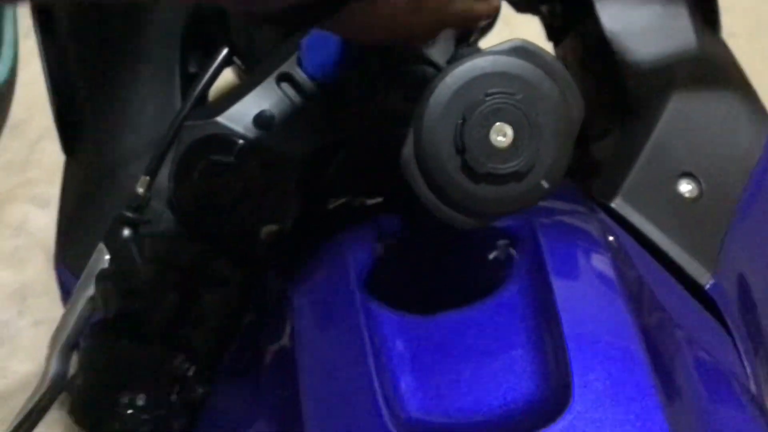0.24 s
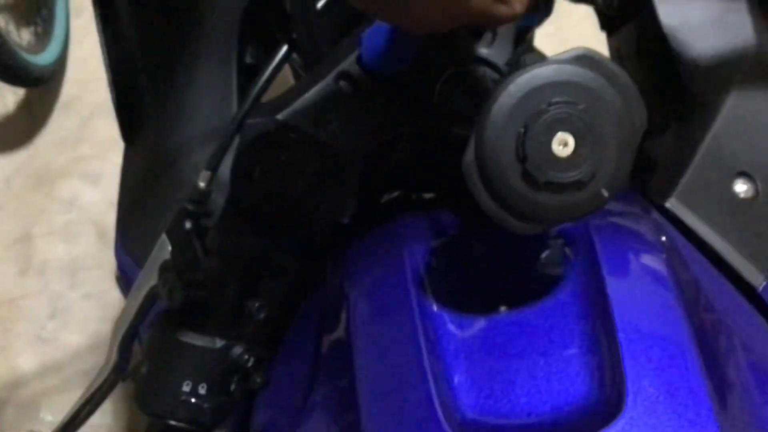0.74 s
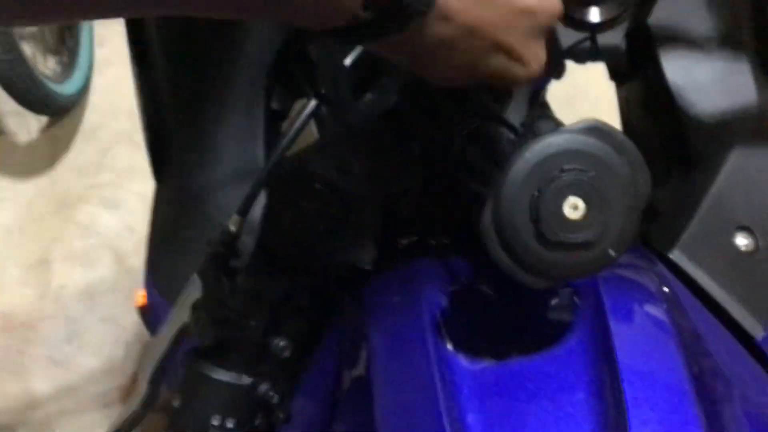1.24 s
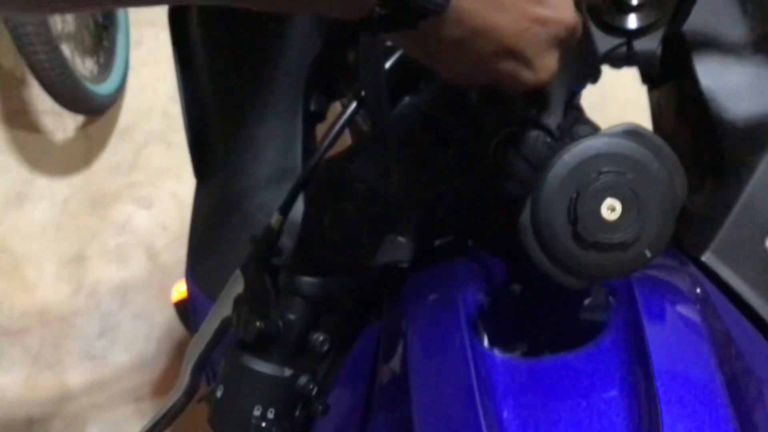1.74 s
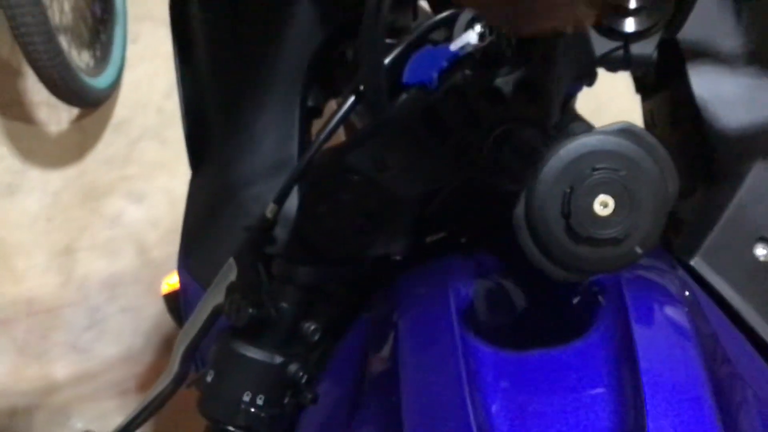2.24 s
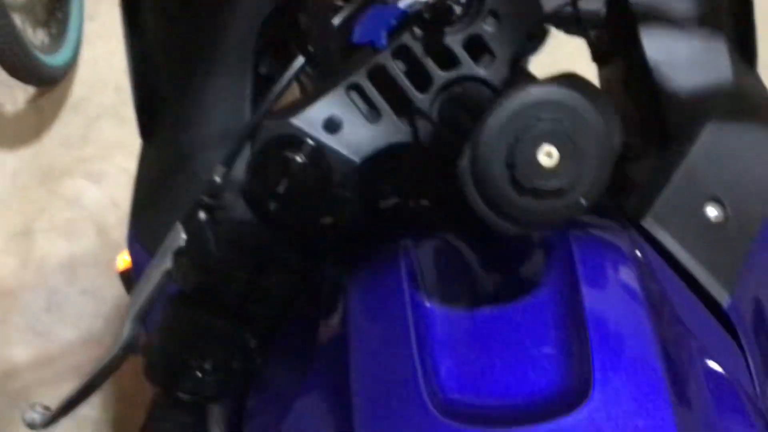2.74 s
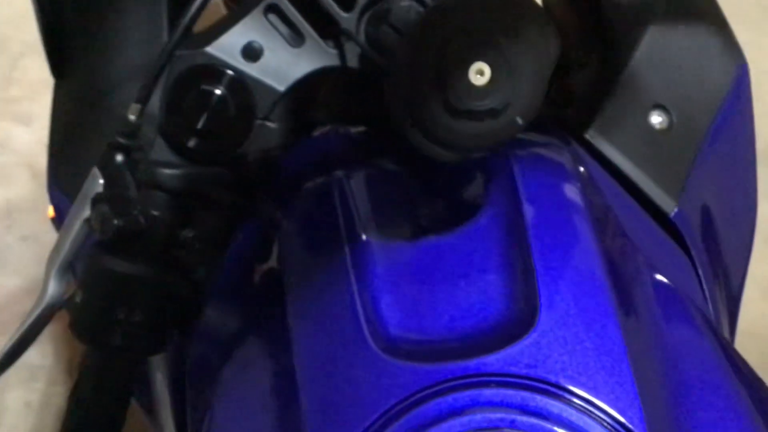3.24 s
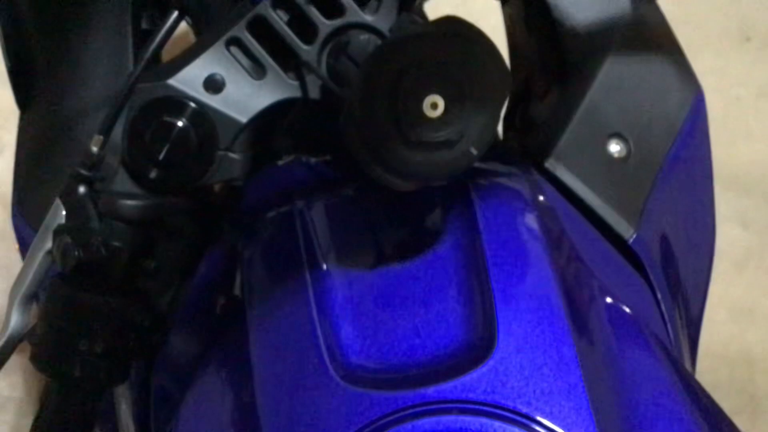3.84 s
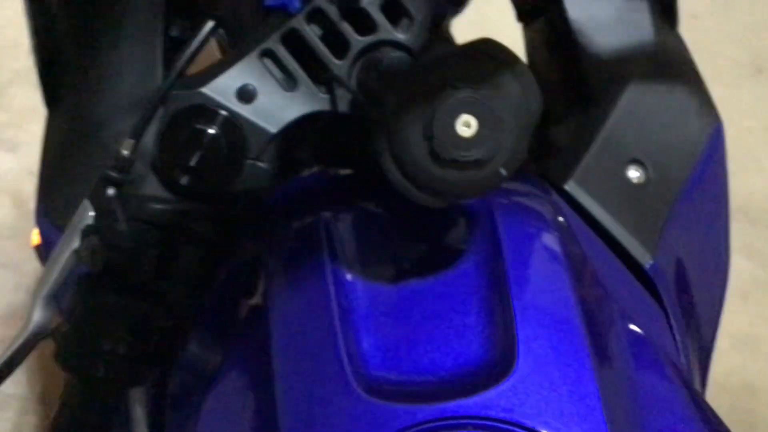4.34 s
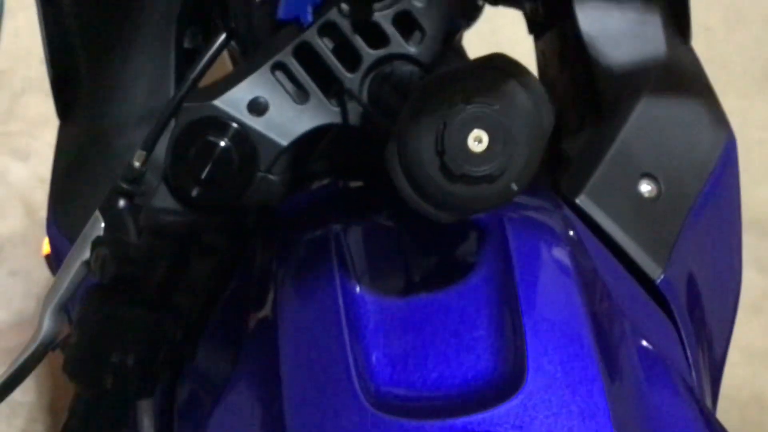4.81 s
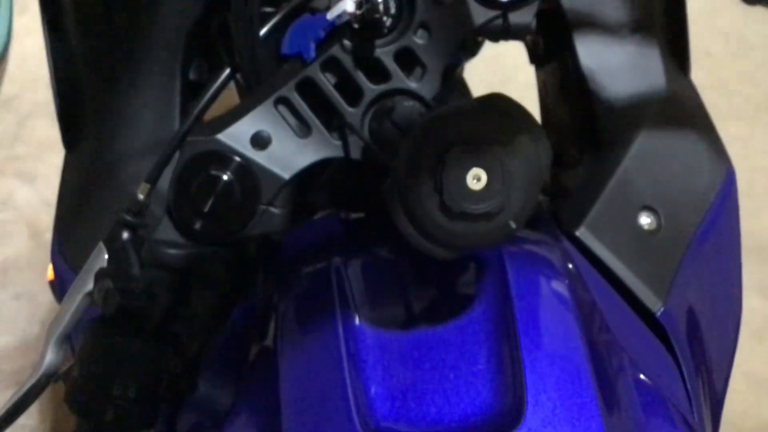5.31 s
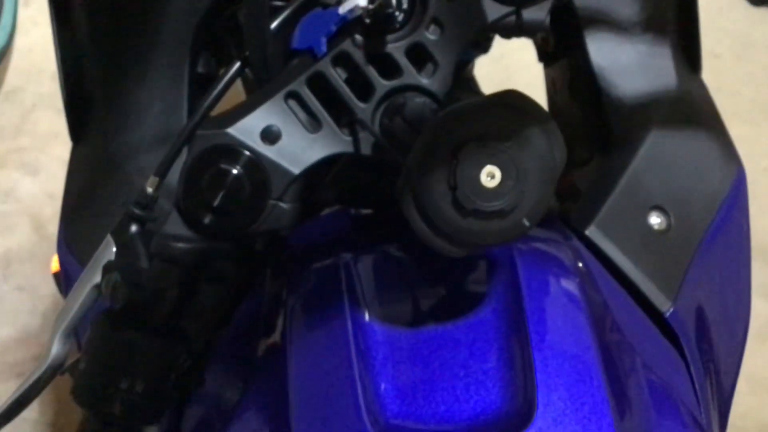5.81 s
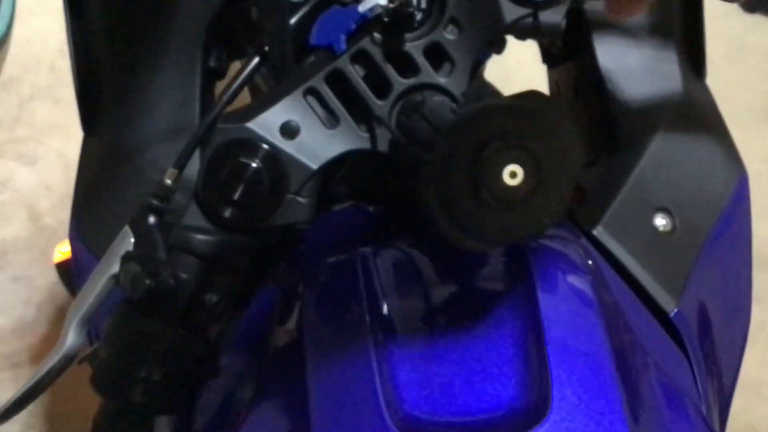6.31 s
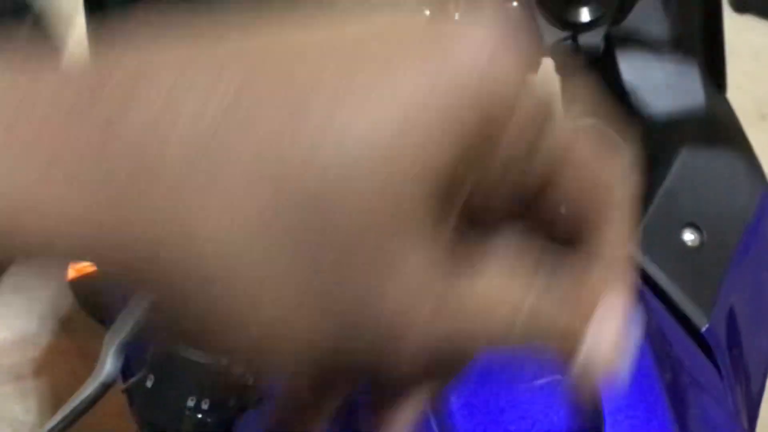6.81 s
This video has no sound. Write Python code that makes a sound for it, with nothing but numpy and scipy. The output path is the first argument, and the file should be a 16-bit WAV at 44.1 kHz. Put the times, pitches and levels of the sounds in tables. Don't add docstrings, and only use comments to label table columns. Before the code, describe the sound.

A close microphone hears a quiet, hard-walled garage with faint low mains hum. From 0.2 to 2.0 seconds, a key makes sparse light metallic clicks, brightest near 1.25, with a slight barrel ring and a barely audible squeak around 2.3. At 2.5 the steering lock releases with hollow knocks and clicks; the bars rub softly from 3.0 and reach straight with a duller knock at 3.5. Tiny clicks follow around 3.8 and 4.6. A crisp switch snap at 4.73 brings a faint hiss, then a loud relay snap at 4.94. The geared starter whines and grinds, rising then sagging until about 5.2, with a thin high clutch tone. The two-cylinder engine catches unevenly at 5.23 and idles from 5.6, about twelve paired low thumps per second, with muffler boom, gas rush and rattling clatter. Another click lands near 5.96; the idle continues to the end, around 7.1.

```python
import sys
import numpy as np
from scipy import signal
from scipy.fft import rfft, irfft, next_fast_len
from scipy.io import wavfile
from scipy.ndimage import uniform_filter1d

SR = 44100
rng = np.random.default_rng(int(sys.argv[2]) if len(sys.argv) > 2 else 0)


def transcribe(u):
    v = np.clip(np.atleast_2d(u).T, -1, 1)
    q = np.round(v * 32767).astype(np.int16)
    wavfile.write(sys.argv[1], SR, q)


def elevation(decibels):
    levels = np.asarray(decibels, float)
    return 10 ** (levels / 20)


N = 311624

# (frequency [Hz], density [dB per Hz])
AIR_SPECTRUM = [(15, -50), (25, -25), (43, -6), (66, -2.5), (102, -9.5), (141, -3.5), (249, -11.5),
                (363, -13), (503, -26), (677, -24), (863, -30.5), (8830, -41.5), (16000, -51)]
AIR_DB = -67
# (frequency [Hz], width [Hz], level [dB])
MAINS_HUM = (58, 1.3, -76.5)
# (frequency [Hz], t60 [s])
GARAGE_DECAY = [(250, 0.53), (660, 0.56), (1740, 0.76), (4590, 0.49), (12000, 0.23)]

# (time [s], level [dB], fall [dB per s], low band [Hz], high band
# [dB])
RUBS = [
    (3.01, -67, 125, 508, -24),
    (3.49, -57, 255, 780, -18),
    (4.734, -57, 229, 1850, 0),
]
RUB_RISE_S, RUB_HIGH_RATIO = 0.027, 2.74
# (start [s], hold [s], level [dB], low band [Hz], high band [dB])
FUEL_PUMP = (4.77, .125, -66, 1800, 3)
RISE_DB = 22
# (start [s], hold [s], pitch [Hz], level [dB])
SQUEAKS = [
    (2.29, .11, 3240, -86),
    (4.905, .012, 8000, -68),
    (6.21, .008, 4100, -50),
]
# (time [s], peak [dB], pitch [Hz], t60 [s])
KNOCKS = [(2.5, -31, 373, 0.22), (2.505, -50, 90, 0.48), (2.513, -29, 240, 0.13),
          (2.573, -35.5, 330.5, 0.19), (3.055, -57.5, 526, 0.5), (3.505, -50, 494, 0.85),
          (3.577, -46.5, 211.6, 0.56), (3.581, -38, 371, 0.17), (3.586, -41.5, 94, 0.29)]

# (time [s], peak [dB], ring [Hz], low knock [dB], bright tick [dB])
KEY_CLICKS = [(0.1625, -62, 1440, 4, -14), (0.2238, -37.5, 1356, -5, -14), (0.648, -65, 2120, -12, -20),
              (0.744, -70, 2580, -6, -22), (1.001, -55.5, 2320, 3.5, -29), (1.1104, -67, 930, 5, -27),
              (1.1996, -49, 2450, 2, -29), (1.2311, -40, 3520, -9.5, -12), (1.265, -29, 3280, -4.5, -16),
              (1.7719, -65, 1540, -5, -27), (1.9085, -56, 2730, 4.5, -6), (1.939, -47, 2110, -2, -0.5),
              (1.9506, -49, 1020, 0, -33.5), (2.0024, -58.5, 900, -3, -5)]
# (time [s], peak [dB], ring [Hz], low knock [dB], bright tick [dB])
LOCK_CLICKS = [(2.5167, -37.5, 1540, 12.5, -10), (2.5753, -39, 955, 1.5, -30), (2.598, -65, 1580, -4, -24),
               (2.622, -44, 1670, -22, -26), (3.0669, -60, 2030, 4, -34), (3.379, -67, 1770, -13, -25.5),
               (3.5187, -38.5, 990, 6, -5.5), (3.5547, -58, 1110, 17, -28.5)]
# (time [s], peak [dB], ring [Hz], low knock [dB], bright tick [dB])
SWITCH_CLICKS = [(3.7956, -58.5, 1460, 3, -12), (3.9065, -57, 1470, 0.5, -18),
                 (4.6327, -45.5, 3980, -15, -18), (4.7348, -23, 2530, -14, -8),
                 (4.9356, -14, 3230, -5, -2.5), (5.9635, -24.5, 2870, 8.5, -4),
                 (7.0624, -31.5, 855, -8, -15)]
KEY_ECHO_DB, LOCK_ECHO_DB, SWITCH_ECHO_DB = -2, -4, -6
RING_SHARE = 0.42
# (frequency [Hz], width [Hz], level [dB])
BARREL_MODES = [(660, 9, -41), (705, 8, -41), (1190, 11, -50), (1300, 11, -51)]
KEY_SEATED_S = 1.15
# (frequency [Hz], width [Hz], level [dB], spacing [Hz])
LOCK_PLATE = (1575, 4.5, -53.5, 44)

SPIN_S, SPIN_STOP_S, SPIN_SETTLE_S = 5.3, 5.965, 0.17
SPIN_FROM_HZ, SPIN_TO_HZ, SPIN_DB, SPIN_SWELL_DB = 10850, 11800, -71, 8
# (start [s], hold [s], level [dB], fall [dB per s])
CLUTCH_SONGS = [
    (5.12, .075, -55.5, 400),
    (5.24, .03, -57.5, 125),
]
CLUTCH_HZ, CLUTCH_RISE_S = 5960, 0.02

# (time [s], mesh frequency [Hz])
STARTER_SPEED = [(4.95, 720), (4.99, 930), (5.015, 1150), (5.04, 1265), (5.068, 1440), (5.11, 1545),
                 (5.15, 1475), (5.192, 1180), (5.3, 1480)]
# (multiple of the mesh [1], level [dB])
MESH_HARMONICS = [(1, -3), (2, -2), (3, -4), (4, -17)]
# (frequency [Hz], width [Hz], level [dB])
CASING_MODES = [(502, 43, -3), (1136, 36, -18), (1297, 24, -9.5), (1505, 27, -11), (1886, 85, -3.5),
                (2505, 100, -11.5), (2965, 34, -15), (3455, 25, 2.5), (4090, 48, -16), (4655, 46, -12),
                (5700, 30, -7), (6800, 33, -1)]
# (frequency [Hz], density [dB per Hz])
GRIND_SPECTRUM = [(60, -24), (150, -3), (373, 5.5), (800, -5), (1520, -4), (3200, -6.5), (5300, -18),
                  (8000, -19.5), (11000, -30), (14500, -27), (16000, -21)]
CRANK_S, CRANK_RISE_S, CRANK_HOLD_S, CRANK_DB = 4.945, 0.02, 0.256, -37
STRAIN_DB_PER_KHZ_S = 0.5956
BITE_DB_PER_KHZ_S = 0.7
LET_GO_DB_PER_S, COAST_DB, COAST_DB_PER_S = 422, -20, 110

# (time [s], first cylinder [dB], second cylinder [dB])
CATCH_CYCLES = [(5.2281, 1.4, 2.5), (5.3559, -1.1, -.6), (5.4608, 1.6, .2), (5.55, -.7, -2.3)]
CATCH_GAP_S = 0.0234
# (time [s], speed [cycles per s])
IDLE_SPEED = [(5.6, 10.978), (5.75, 12.209), (5.9, 11.757), (6.1, 11.847), (6.3, 11.903), (6.45, 11.502),
              (6.6, 11.565), (6.8, 11.71), (7.07, 11.225)]
STEADY_S, SECOND_LAG_CYCLES, SECOND_DB = 5.6408, 0.25, -5.2
FULL_LOAD_SPEED, LOAD_DB_PER_SPEED = 11.2, -2.2
# (frequency [Hz], width [Hz], signed strength [1])
BOOM_MODES = [(59.7, 3, -.02), (80.6, 4.64, .064), (97.04, 4.52, -.162), (105.12, 5.64, .117)]
# (frequency [Hz], width [Hz], level [dB])
PIPE_MODES = [(139, 25, -24.5), (201.2, 10.4, -30), (240, 26, -36), (286.5, 12.3, -32.5),
              (377.3, 15.6, -32), (496.6, 52, -27), (516, 17, -31.5), (629, 30, -33.5)]
PIPE_RISE_S = 0.0069
# (frequency [Hz], width [Hz], level [dB])
BLOCK_MODES = [(523, 32, -17.5), (1110, 32, -14), (1329, 17, -20.5), (1460, 26, -26), (1940, 100, -21),
               (2580, 71, -51), (3454, 54, -24), (4170, 120, -41)]
CLATTER_DB, TAPS_PER_S = 2.5, 160
# (frequency [Hz], density [dB per Hz])
ROAR_SPECTRUM = [(60, -37), (125, -16.5), (300, -16), (430, -22.5), (560, -15.5), (870, -30.5), (1600, -29),
                 (2400, -34.5), (3450, -37), (5000, -46.5), (7300, -62), (9000, -56), (14500, -57),
                 (16000, -47.5)]
ROAR_DB = -34
STEADY_RUSH = 0.5
# (time [s], opening [dB])
THROTTLE = [(5.2, 6.5), (5.35, -2.5), (5.55, -2), (5.8, 1.5), (7.07, -1.5)]


def evened(x):
    return x / np.sqrt(np.mean(x ** 2) + 1e-20)


def read(points, hz):
    f, value = np.transpose(points)
    return np.interp(np.log(hz + 1), np.log(f + 1), value)


def add(mix, s, sound):
    part = mix[round(s * SR):][:len(sound)]
    part += sound[:len(part)]


def curve(rows):
    s, value = np.transpose(rows)
    return np.interp(np.arange(N) / SR, s, value)


def envelope_db(start, rise, hold, fall):
    t = np.arange(N) / SR - start
    attack = np.minimum(RISE_DB * (t / rise - 1), 0)
    return attack - fall * np.maximum(t - rise - hold, 0) - 200 * (t < 0)


def noise(points):
    size = next_fast_len(N)
    gain = elevation(read(points, np.fft.rfftfreq(size, 1 / SR)))
    return evened(irfft(rfft(rng.standard_normal(size)) * gain, size)[:N])


def resonate(x, hz, width):
    turn = np.exp(2j * np.pi * np.cumsum(hz * np.ones(len(x))) / SR)
    r = np.exp(-np.pi * width / SR)
    return 2 * (turn * signal.lfilter([1 - r], [1, -r], x / turn)).real


def ring(hz, width, seconds):
    t = np.arange(round(seconds * SR)) / SR
    return np.exp(-np.pi * width * t) * np.sin(2 * np.pi * hz * t)


def garage(x):
    taps = np.zeros(SR)
    at = np.arange(250, SR - 20, 20)
    taps[at + rng.integers(0, 20, len(at))] = rng.choice([-1., 1.], len(at))
    hz, t, z = signal.stft(taps, SR, nperseg=256)
    decay = elevation(-60 * t / read(GARAGE_DECAY, hz)[:, None])
    tail = signal.istft(z * decay, SR, nperseg=256)[1]
    return signal.fftconvolve(x, tail / np.linalg.norm(tail))[:N]


def air():
    hz, width, db = MAINS_HUM
    steady = np.sqrt(2) * np.sin(2 * np.pi * hz * np.arange(N) / SR)
    throb = 0.5 * evened(resonate(rng.standard_normal(N), hz, width))
    return elevation(AIR_DB) * noise(AIR_SPECTRUM) + elevation(db) * (steady + throb)


def rub(level_db, low_hz, high_db):
    on = np.flatnonzero(level_db > -110)
    high_hz = RUB_HIGH_RATIO * low_hz
    grit = signal.lfilter([1], [1, -0.6], rng.standard_normal(len(on)))
    low = evened(resonate(grit, low_hz, 590))
    high = evened(resonate(resonate(grit, high_hz, 1900), high_hz, 1900))
    return on[0] / SR, elevation(level_db[on]) * (low + elevation(high_db) * high)


def rubbing():
    out = np.zeros(N)
    for s, db, fall, low_hz, high_db in RUBS:
        add(out, *rub(db + envelope_db(s, RUB_RISE_S, 0, fall), low_hz, high_db))
    s, hold, db, low_hz, high_db = FUEL_PUMP
    add(out, *rub(db + envelope_db(s, 0.05, hold, 2000), low_hz, high_db))
    return out


def squeak(s, hold, hz, db):
    level_db = db + envelope_db(s, 0.02, hold, 900)[round(s * SR):][:SR // 4]
    return elevation(level_db) * evened(resonate(rng.standard_normal(len(level_db)), hz, 60))


def thuds():
    out = np.zeros(N)
    push = signal.windows.hann(60)
    for s, db, hz, t60 in KNOCKS:
        others = sum(ring(hz * k, 4 / t60, 0.5) for k in rng.uniform(0.524, 1.6, 4))
        body = ring(hz, 3.9 / t60, 0.5) + 0.5 * others
        body *= 1 - np.exp(-np.arange(len(body)) / (0.006 * SR))
        add(out, s, elevation(db) * np.convolve(body, push / push.sum()))
    out = out + elevation(-8) * garage(out)
    for s, hold, hz, db in SQUEAKS:
        add(out, s, squeak(s, hold, hz, db))
    return out


def click(hz, low_db, tick_db):
    t = np.arange(1500) / SR
    a, b, c = rng.standard_normal((3, len(t)))
    burst = (t / 0.0022) ** 2 * np.exp(2 - 2 * t / 0.0028)
    band = signal.butter(6, (900, 5250), "bandpass", fs=SR, output="sos")
    crack = evened(signal.sosfilt(band, a))
    knock = elevation(low_db) * evened(resonate(b, 427, 280)) * t / 0.0078 * np.exp(1 - t / 0.0045)
    bright = resonate(resonate(c, 21500, 3500), 14700, 7600) + 0.37 * resonate(c, 9200, 2100)
    tick = elevation(tick_db) * evened(bright)
    tone = RING_SHARE * np.sin(2 * np.pi * hz * t) * burst ** 2
    direct = tone + (0.45 * crack + 0.98 * tick) * burst + knock
    scatter = (crack + 0.46 * evened(resonate(c, hz, 900)) + 0.44 * tick) * np.exp(-t / 0.0036)
    return direct, scatter + 2.35 * knock


def clicks():
    near, far = np.zeros(N), np.zeros(N)
    groups = ((KEY_CLICKS, KEY_ECHO_DB), (LOCK_CLICKS, LOCK_ECHO_DB), (SWITCH_CLICKS, SWITCH_ECHO_DB))
    for table, echo_db in groups:
        for s, db, hz, low_db, tick_db in table:
            direct, scattered = click(hz, low_db, tick_db)
            add(near, s, elevation(db - 9) * direct)
            add(far, s, elevation(db + echo_db - 17.5) * scattered)
    key = near * (np.arange(N) < KEY_SEATED_S * SR)
    modes = sum(elevation(db) * ring(hz, width, 0.5) for hz, width, db in BARREL_MODES)
    barrel = signal.oaconvolve(key, modes)[:N]
    lock = near * curve([(2.4, 0), (2.45, 1), (3.6, 1), (3.7, 0)])
    hz, width, db, spacing = LOCK_PLATE
    pair = ring(hz, width, 0.5) + ring(hz + spacing, width, 0.5)
    plate = elevation(db) * signal.oaconvolve(lock, pair)[:N]
    return near + garage(far) + barrel + plate


def freewheel():
    t = np.arange(N) / SR
    since = np.clip(t - SPIN_S, 0, None)
    settling = np.exp(-since / SPIN_SETTLE_S)
    hz = SPIN_TO_HZ - (SPIN_TO_HZ - SPIN_FROM_HZ) * settling
    spin = sum(gain * evened(resonate(rng.standard_normal(N), hz * k, 25)) for k, gain in ((1, 1), (1.25, 0.6)))
    spinning = (since > 0) * (since < SPIN_STOP_S - SPIN_S)
    spin *= elevation(SPIN_DB - SPIN_SWELL_DB * settling) * spinning
    song = sum(elevation(db + envelope_db(s, CLUTCH_RISE_S, hold, fall)) for s, hold, db, fall in CLUTCH_SONGS)
    fuzz = 0.6 * evened(resonate(rng.standard_normal(N), CLUTCH_HZ, 40))
    return spin + song * (np.sin(2 * np.pi * CLUTCH_HZ * t) + fuzz)


def starter():
    hz = curve(STARTER_SPEED)
    strain = uniform_filter1d(abs(np.gradient(hz)) * SR / 1000, 1300)
    cranking = envelope_db(CRANK_S, CRANK_RISE_S, CRANK_HOLD_S, LET_GO_DB_PER_S) + STRAIN_DB_PER_KHZ_S * strain
    coasting = COAST_DB + envelope_db(CRANK_S, CRANK_RISE_S, CRANK_HOLD_S + 0.16, COAST_DB_PER_S)
    db = CRANK_DB + np.maximum(cranking, coasting)
    jitter = 0.12 * uniform_filter1d(rng.standard_normal(N), 200)
    turns = np.cumsum(hz * (1 + jitter)) / SR
    teeth = np.zeros(N)
    for k, level_db in MESH_HARMONICS:
        wear = evened(uniform_filter1d(uniform_filter1d(rng.standard_normal(N), 330), 330))
        teeth += elevation(level_db + 4.5 * wear) * np.sin(2 * np.pi * k * turns)
    lumps = elevation(1.4 * np.sin(2 * np.pi * turns / 38))
    slowing = uniform_filter1d(1. * (np.gradient(hz) < 0), 600)
    bite = elevation(BITE_DB_PER_KHZ_S * strain * slowing)
    grind = noise(GRIND_SPECTRUM)
    drive = evened(teeth) * lumps * bite + 0.35 * grind
    casing = sum(elevation(peak_db) * resonate(drive, f, width * 1.3) for f, width, peak_db in CASING_MODES)
    on = curve([(4.94, 0), (4.945, 1), (5.4, 1), (5.41, 0)])
    return elevation(db) * on * evened(0.6 * grind + 0.24 * drive + 3 * casing)


def firings():
    speed = curve(IDLE_SPEED)
    load_db = LOAD_DB_PER_SPEED * (speed - FULL_LOAD_SPEED)
    turns = np.cumsum(speed) / SR
    turns -= turns[round(STEADY_S * SR)]
    out = np.zeros(N)
    for lag, db in ((0, 0), (SECOND_LAG_CYCLES, SECOND_DB)):
        at = np.searchsorted(turns, np.arange(lag, turns[-1]))
        out[at] = elevation(load_db[at] + db)
    for s, first_db, second_db in CATCH_CYCLES:
        out[round(s * SR)] = elevation(first_db)
        out[round((s + CATCH_GAP_S) * SR)] = elevation(second_db)
    return out


def exhaust_pipe(fire):
    modes = sum((-1) ** k * elevation(db) * ring(hz, width, 0.3) for k, (hz, width, db) in enumerate(PIPE_MODES))
    swell = 1 - np.exp(-np.arange(len(modes)) / (PIPE_RISE_S * SR))
    return signal.fftconvolve(fire, modes * swell)[:N]


def gas_puffs(fire):
    t = np.arange(9000) / SR
    flow = t / 0.01 * np.exp(1 - t / 0.0077) + 0.5 * (np.exp(-t / 0.19) - np.exp(-t / 0.011))
    return signal.fftconvolve(fire, flow)[:N] * elevation(curve(THROTTLE))


def block_clatter():
    rattle = elevation(4 * np.minimum(rng.exponential(1, N), 2.5)) * rng.standard_normal(N)
    out = np.zeros(N)
    for hz, width, db in BLOCK_MODES:
        taps = rattle * (rng.random(N) < TAPS_PER_S / SR)
        out += elevation(db) * evened(resonate(taps, hz, width))
    return out


def engine():
    fire = firings()
    boom_modes = sum(strength * ring(hz, width, 1) for hz, width, strength in BOOM_MODES)
    boom = elevation(0.5) * signal.fftconvolve(fire, boom_modes)[:N]
    uneven = fire * elevation(0.7 * rng.standard_normal(N))
    puff = gas_puffs(uneven)
    running = np.cumsum(fire) > 0
    gas = noise(ROAR_SPECTRUM) * (puff + STEADY_RUSH * running)
    rush = elevation(ROAR_DB - 5.5) * (gas + elevation(CLATTER_DB) * block_clatter() * puff)
    return boom + exhaust_pipe(uneven) + rush + elevation(-9) * garage(rush)


def scene():
    crank = starter()
    background = air() + rubbing() + thuds() + clicks()
    starting = freewheel() + crank + elevation(-7.5) * garage(crank)
    return (background + starting + engine())[None]


def band_limit(x):
    return signal.sosfilt(signal.butter(12, 15850, fs=SR, output="sos"), x)


def record(dry):
    low_cut = signal.butter(4, 40, "highpass", fs=SR, output="sos")
    treble = signal.butter(4, 16400, "highpass", fs=SR, output="sos")
    mix = signal.sosfilt(low_cut, dry - signal.sosfiltfilt(treble, dry))
    return band_limit(mix)


dry = scene()
out = record(dry)
transcribe(out)
```